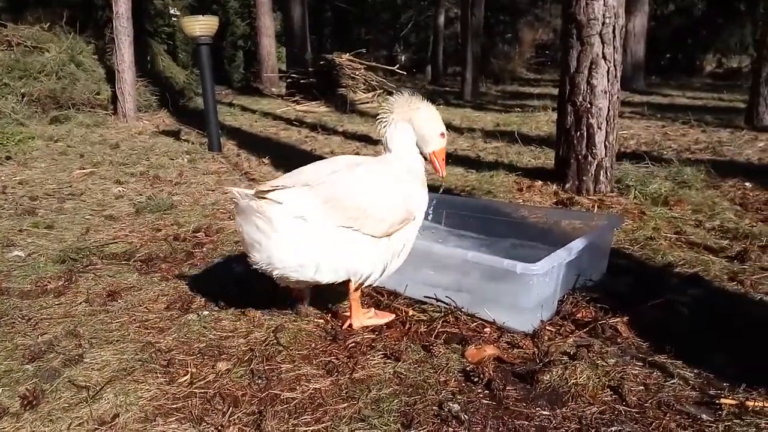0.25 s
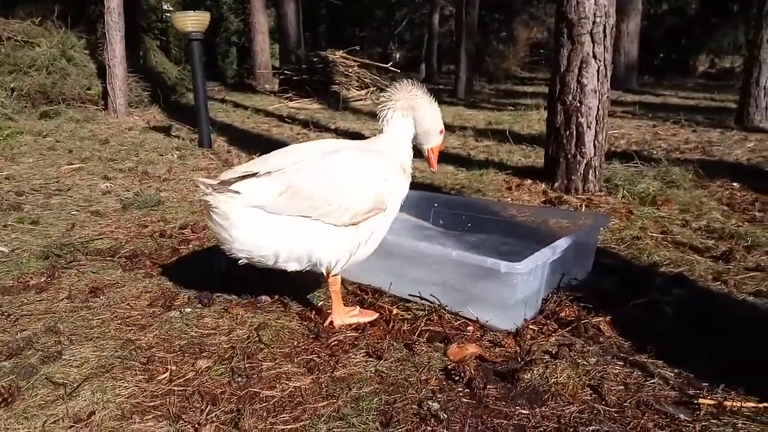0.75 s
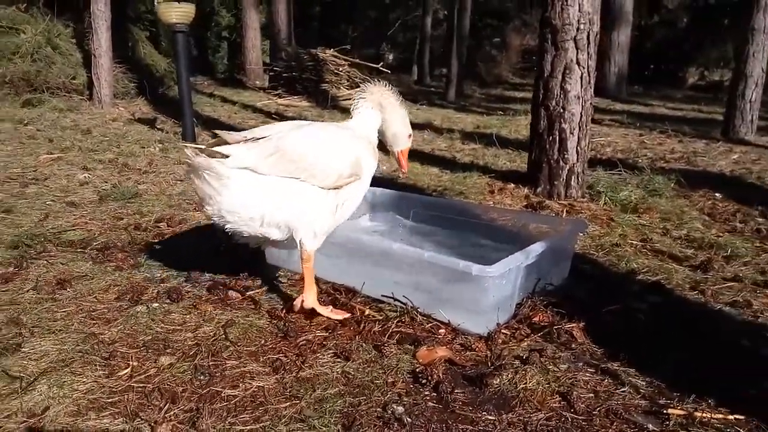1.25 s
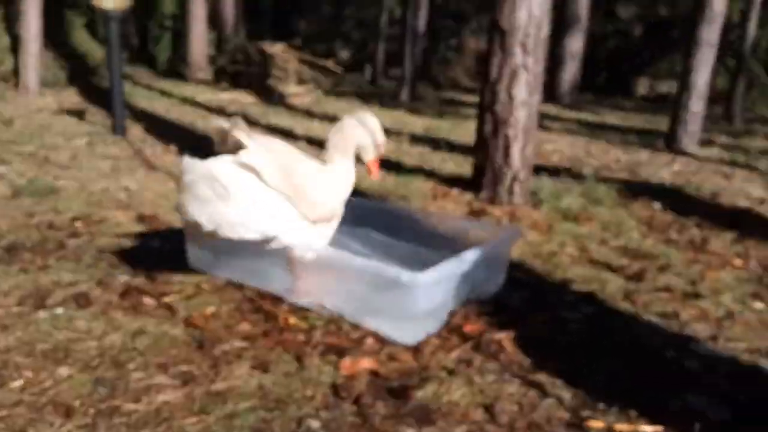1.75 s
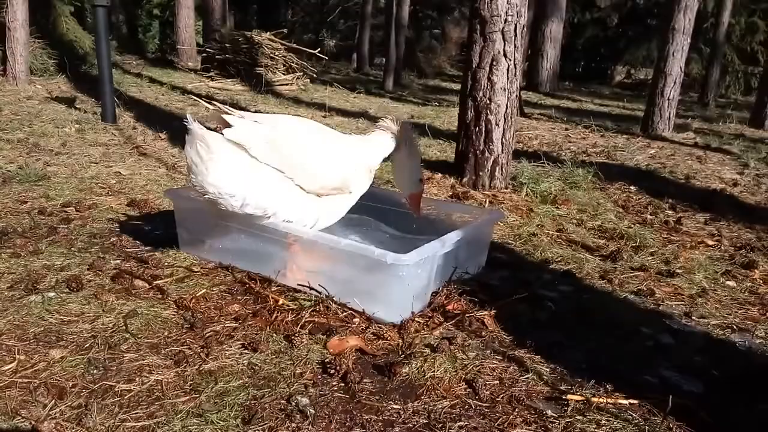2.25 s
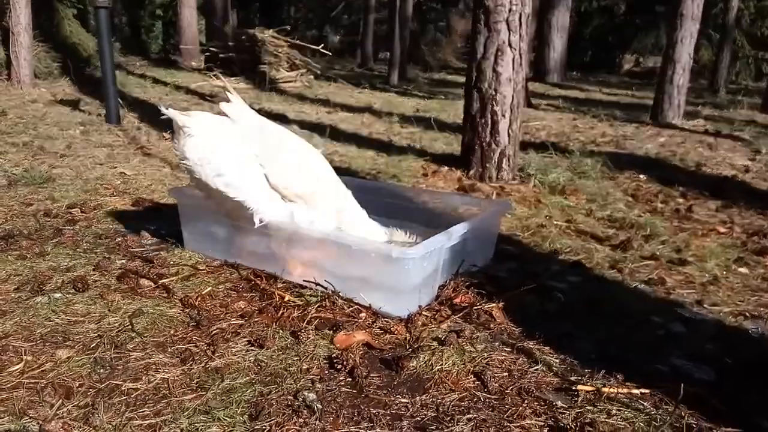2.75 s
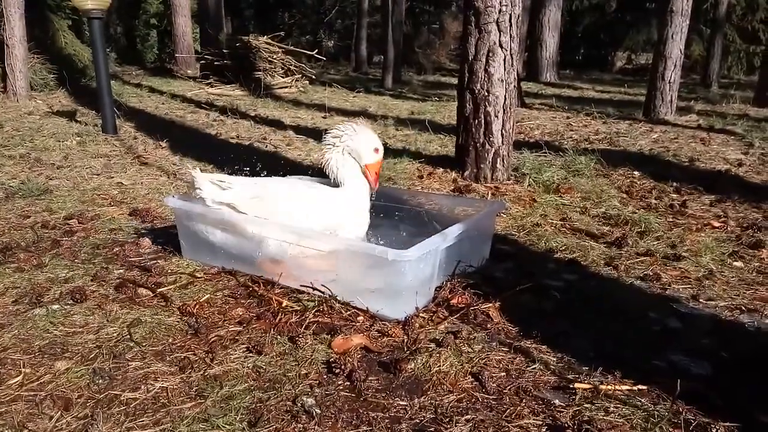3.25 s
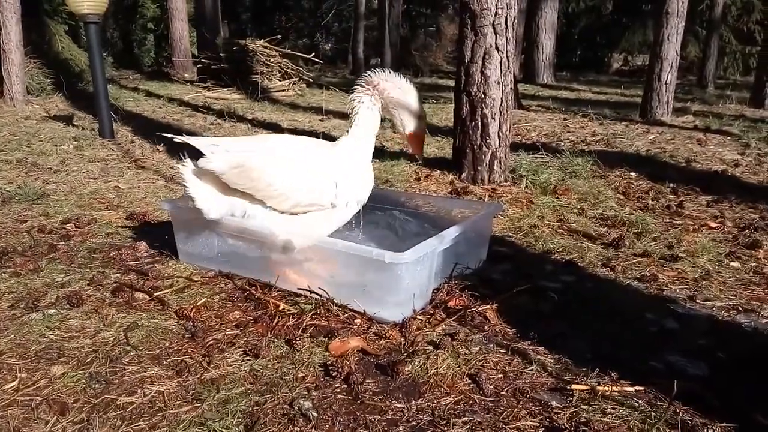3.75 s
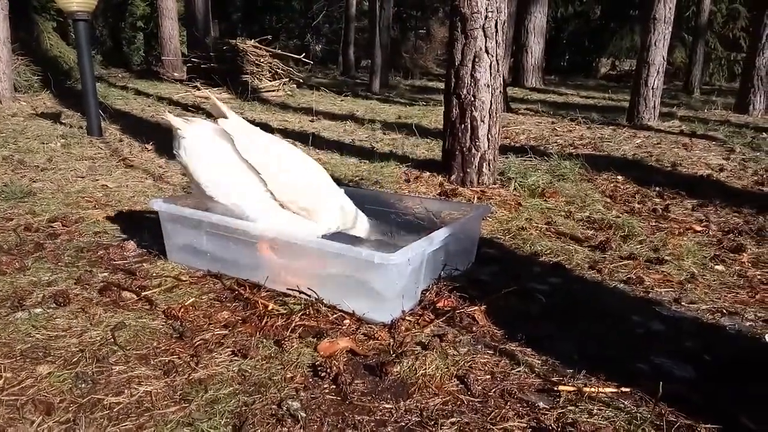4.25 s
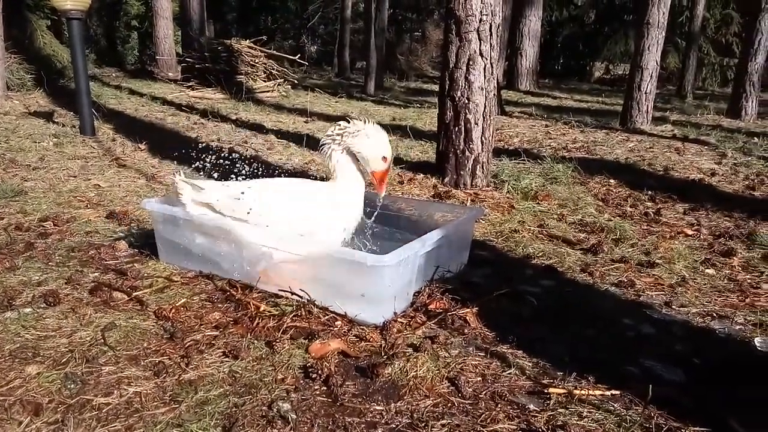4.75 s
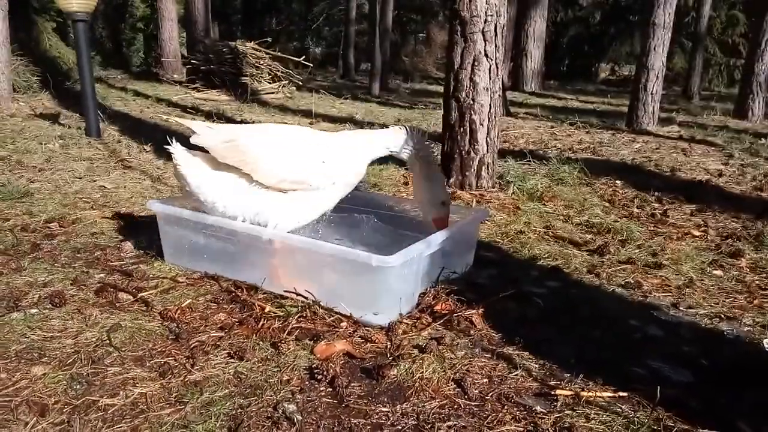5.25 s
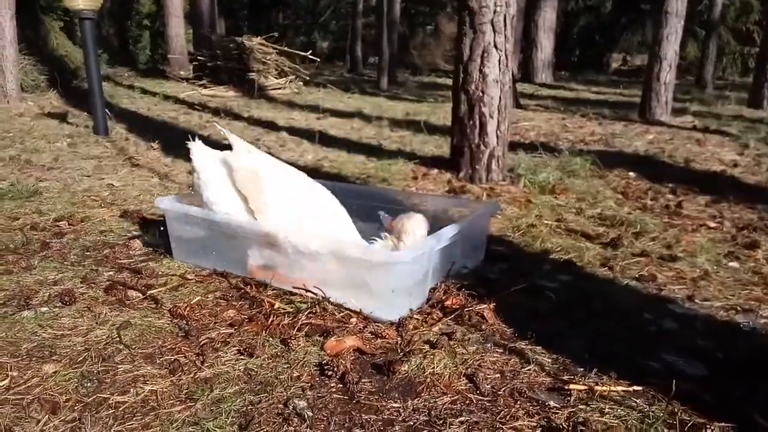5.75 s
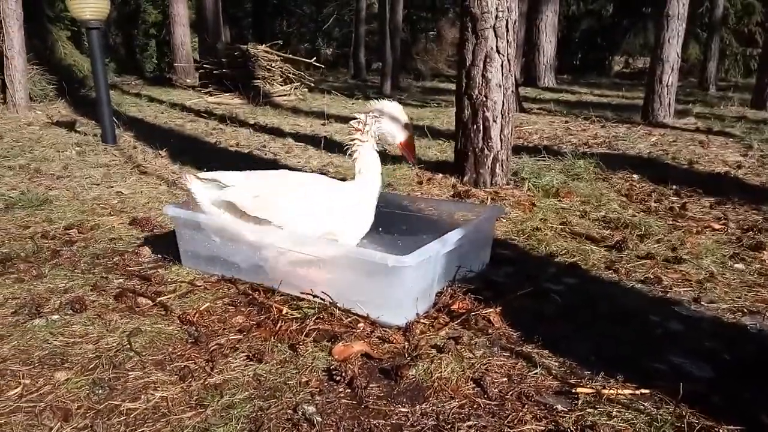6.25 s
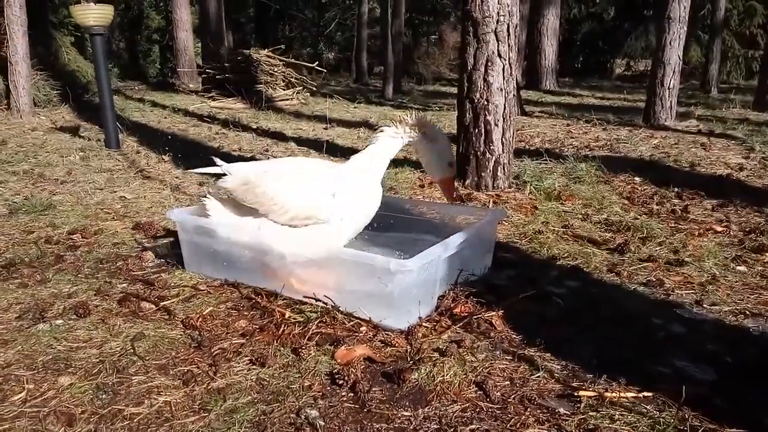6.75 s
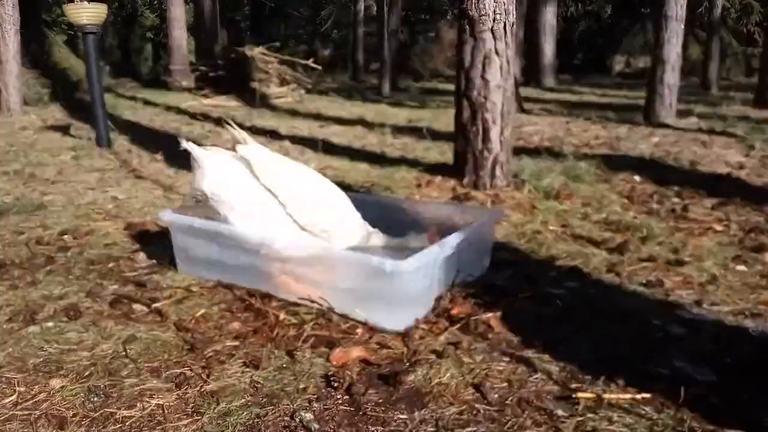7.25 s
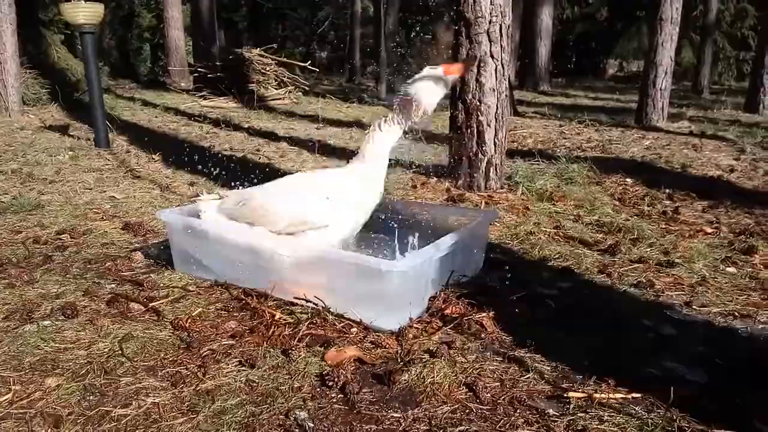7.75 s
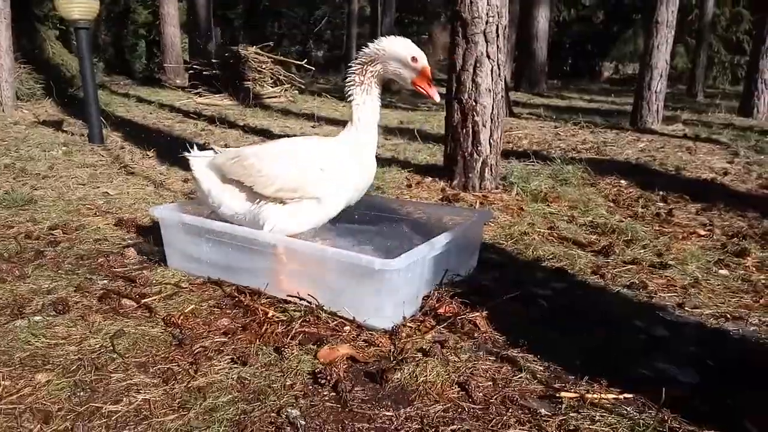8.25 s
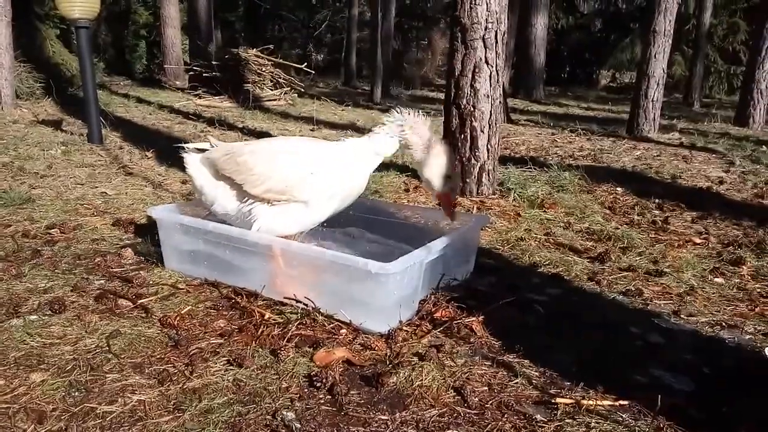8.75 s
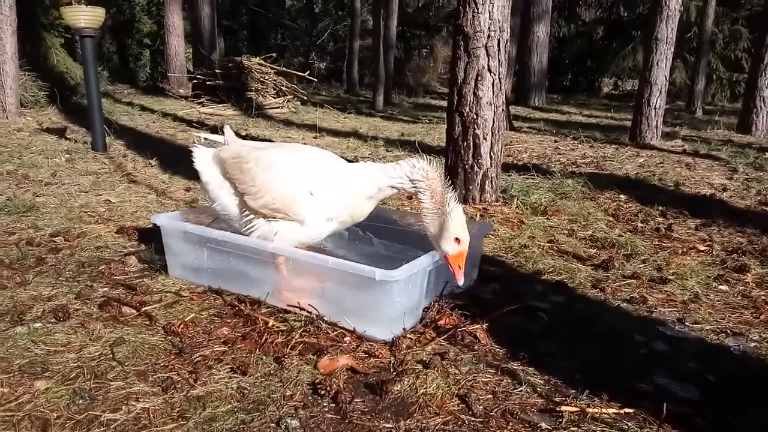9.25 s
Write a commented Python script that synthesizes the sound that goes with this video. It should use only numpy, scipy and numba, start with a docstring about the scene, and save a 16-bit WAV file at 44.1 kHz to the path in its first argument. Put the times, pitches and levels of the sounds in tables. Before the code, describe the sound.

Outdoors near trees, gusts rumble and buffet the microphone, mostly on the right, while a goose treads faintly on dry needles. It climbs into a shallow plastic tub with a sharp crack, hollow knocks and dull thuds, then ducks its head four times; each rise brings a wet slap, spray and trickling run-off with gurgles and plinks. The wind fades, and a last firm knock sounds near the end over quiet air.

```python
"""A goose steps over dry pine needles, each a tiny click, while gusts rumble and buffet two microphone ports.
It climbs into a shallow plastic tub outdoors: feet and body knock damped wall modes and thud the floor.
It bathes, ducking its head again and again: noise bursts slap, the run-off falls as spray and droplet ticks,
and gurgles and bubbles ring as dying sines. The gusts give out early; a steady hush of noise lies under it all."""
import sys
import numpy as np
from scipy import signal
from scipy.fft import rfft, irfft, next_fast_len
from scipy.io import wavfile
from scipy.ndimage import uniform_filter1d
from numba import njit

SR = 44100
rng = np.random.default_rng(int(sys.argv[2]) if len(sys.argv) > 2 else 0)


def wav_out(sig):
    """Save sig, one row per channel (or a flat mono array), as 16-bit PCM at SR to the path in sys.argv[1]."""
    wavfile.write(sys.argv[1], SR, np.round(np.clip(np.atleast_2d(sig).T, -1, 1) * 32767).astype(np.int16))


N = 419391
TIME = np.arange(N) / SR

# loudest splashes and footfalls, those before 1.4 s on the needles: t/s, relative level/dB, t60/s, centre f/Hz
SPLASHES = [(.165, -37.5, 0.032, 7000), (0.387, -39.5, 0.045, 5500), (.606, -57.5, 0.058, 3680),
            (0.78, -52.5, 0.054, 4400), (1.5585, -22, 0.014, 3800), (1.628, -41, .03, 5200),
            (1.648, -27, 0.012, 5000), (1.723, -34, 0.011, 5860), (1.7738, -29, 0.036, 3300),
            (1.835, -40.5, .022, 8030), (1.895, -35, 0.063, 3800), (1.907, -32.5, 0.053, 4700),
            (2.038, -42, 0.02, 5400), (2.122, -44, 0.021, 12000), (2.5, -39, 0.014, 3040),
            (2.6518, -37, .013, 1780), (2.861, -36, 0.038, 4220), (3.146, -39.5, 0.14, 4430),
            (3.2784, -36.5, 0.031, 4600), (3.364, -30.5, 0.019, 5100), (3.4465, -37.5, 0.036, 2980),
            (3.563, -46.5, 0.041, 5670), (3.818, -44.5, 0.024, 5400), (3.9887, -43, 0.043, 3940),
            (4.173, -42, 0.023, 2920), (4.311, -46.5, .025, 3500), (4.448, -25.5, 0.029, 4420),
            (4.4659, -27.5, 0.037, 4360), (4.573, -43, 0.07, 4560), (4.613, -44, 0.032, 5200),
            (4.892, -41.5, 0.031, 2980), (5.101, -41, 0.064, 6100), (5.231, -43, 0.048, 5000),
            (5.4683, -36.5, 0.028, 4270), (5.5734, -34, 0.041, 4160), (5.752, -23.5, 0.029, 4400),
            (5.764, -28.5, .035, 4350), (5.8955, -42, 0.023, 2210), (5.907, -39, 0.031, 3500),
            (6.084, -32, 0.024, 5000), (6.097, -32.5, 0.037, 3540), (6.1589, -37, 0.061, 4300),
            (6.197, -34, 0.031, 9300), (6.203, -40, .03, 3200), (6.712, -42, 0.043, 5840),
            (6.727, -41, .04, 5800), (6.748, -39, 0.041, 4700), (6.815, -47.5, 0.048, 4900),
            (7.065, -47.5, 0.033, 2800), (7.125, -49.5, .025, 3500), (7.361, -31.5, 0.074, 4670),
            (7.37, -28.5, 0.028, 4600), (7.375, -26.5, 0.029, 3130), (7.627, -40.5, 0.054, 3960),
            (7.9742, -41, 0.029, 3730), (8.0846, -38.5, 0.05, 2390), (8.173, -39.5, 0.042, 3000),
            (8.3284, -39.5, 0.056, 3180), (8.45, -37, 0.032, 3600), (8.586, -41.5, 0.026, 5200),
            (8.9331, -32.5, 0.03, 2820), (8.968, -47, .02, 4660), (9.328, -52, 0.03, 5740)]
BUILD_UP_SHARE = 0.25  # a splash's build-up scales with this share of its t60


def from_db(db):
    """Decibels to gain."""
    return 10 ** (np.asarray(db) / 20)


def rms_one(x):
    """Scale to rms 1."""
    return x / np.sqrt(np.mean(x ** 2) + 1e-20)


def band(x, low_hz, high_hz, order=2):
    """Butterworth band-pass."""
    edges_hz = np.clip([low_hz, high_hz], 10, .45 * SR)
    sos = signal.butter(order, edges_hz, "band", fs=SR, output="sos")
    return signal.sosfilt(sos, x + 1e-18)


def coloured(x, spectrum):
    """Filter x by a gain curve of (f/Hz, gain/dB) points, joined along log f."""
    size = next_fast_len(N + 4096)
    hz, db = np.transpose(spectrum)
    bin_hz = np.fft.rfftfreq(size, 1 / SR)
    gain = from_db(np.interp(np.log(bin_hz + 1), np.log(hz), db))
    return irfft(rfft(x, size) * gain, size)[..., :N]


def drift(rate_hz):
    """Random values drawn rate_hz times a second, joined by straight lines; rms 1."""
    points = rng.standard_normal(N // 40)
    return rms_one(np.interp(TIME * rate_hz, np.arange(N // 40), points))


def evened(x, span_s):
    """Hold the rms near 1 over span_s; faster detail stays."""
    power = uniform_filter1d(np.mean(x ** 2, axis=0), max(int(span_s * SR), 1))
    smooth = uniform_filter1d(power, max(int(span_s * SR / 2), 1))
    return x / np.sqrt(smooth + np.mean(power) / 20)


def add(out, s, sound):
    """Mix a sound in at time s."""
    at = int(np.clip(s * SR, 0, N - 1))
    out[..., at:at + sound.shape[-1]] += sound[..., :N - at]


def swell(s, length_s, rise_db_per_s, fall_db_per_s):
    """Attack, hold and release, as a power that holds at 1."""
    rise_db = rise_db_per_s * np.maximum(s - TIME, 0)
    fall_db = fall_db_per_s * np.maximum(TIME - s - length_s, 0)
    return np.exp(-np.log(10) / 10 * np.minimum(rise_db + fall_db, 200))


def nearby_echoes(sound, echo_db=-7.5, latest_s=0.0055, count=4):
    """The nearest surfaces answer within milliseconds, differently for every call and port."""
    out = sound * np.ones((2, 1))
    for port in range(2):
        slots = (np.arange(count) + rng.random(count)) / count
        lags = 1 + (latest_s * SR * slots).astype(int)
        path = np.zeros(lags[-1] + 1)
        path[lags] = from_db(echo_db) * rng.choice([-1, 1], count)
        path[0] = 1
        out[port] = np.convolve(out[port], path)[:out.shape[1]] / np.linalg.norm(path)
    return out


@njit
def bubble_rings(s, hz, gain, t60, rise, phases):
    """Each bubble is a dying sine whose pitch climbs as it nears the surface; gain and phase are per port."""
    out = np.zeros((2, N))
    for k in range(len(s)):
        at = int(s[k] * SR)
        for i in range(max(0, -at), min(int(t60[k] * SR), N - at)):
            t = i / SR
            age = t / t60[k]
            height = np.exp(-6.9 * age) * min(1., t * hz[k] / 2)
            phase = 2 * np.pi * hz[k] * t * (1 + rise[k] * (age - .25) / 2)
            for port in range(2):
                out[port, at + i] += height * gain[port, k] * np.sin(phase + phases[port, k])
    return out


def bubbles(s, hz, db, t60, rise, place, phase_spread=1.0, pan_db=6.0):
    """Tub reflections give each bubble its own level and phase at each port, the more so the higher it rings."""
    full_spread_hz = 3250  # the port difference grows with f/full_spread_hz, up to double
    apart = np.array([[1], [-1]]) * place * np.minimum(hz / full_spread_hz, 2)
    gain = from_db(db + pan_db * apart)
    return bubble_rings(s.copy(), hz.copy(), gain, t60.copy(), rise.copy(), phase_spread * apart)


def air(apart):
    """Steady outdoor hush: noise of a fixed spectrum, partly different at each port."""
    # hush spectrum: f/Hz, relative density/dB
    hush_spectrum = [(20, -12), (80, 11.5), (150, 4.5), (350, -2.5), (750, 1), (1300, -10), (2500, -14),
                     (4000, -17.5), (6500, -11.5), (9000, -10.5), (15000, -24.5)]
    level_db = -67
    mid, side = rms_one(coloured(rng.standard_normal((2, N)), hush_spectrum))
    return from_db(level_db) * (mid + apart * side * [[1], [-1]])


def wind(gain_db, lump_db, eddy_db, eddy_growth):
    """Each port has its own lumpy rumble; strong gusts shed smaller, brighter eddies."""
    # light air between the gusts, until it drops: end t/s, relative left level/dB, right level/dB
    light_air = (4.3, -64.5, -67)
    # gusts at the ports: t/s, length/s, relative left level/dB, right level/dB
    gust_rows = [(0.057, .01, -55, -47.5), (0.174, 0.065, -48, -46.5), (0.237, 0.048, -40.5, -44),
                 (0.32, 0.049, -44, -70), (0.414, .02, -39.5, -51), (0.44, 0.01, -44, -37),
                 (0.489, .05, -34, -26.5), (0.576, 0.034, -51, -27.5), (0.65, 0.015, -62, -33.5),
                 (0.743, 0.042, -41, -25), (0.799, 0.012, -32.5, -32.5), (0.846, 0.061, -41, -31.5),
                 (0.92, .012, -50, -37), (0.969, 0.08, -51, -29), (1.095, 0.0095, -54, -29),
                 (1.12, 0.008, -43.5, -31.5), (2.25, .07, -75, -47), (2.334, 0.019, -72, -39),
                 (2.404, 0.031, -71, -48), (2.498, 0.038, -54, -35), (2.635, 0.096, -59, -35),
                 (3.386, 0.017, -55, -64), (3.492, 0.014, -57.5, -70), (3.553, 0.025, -55.5, -69),
                 (3.7, 0.027, -57, -60)]
    # rumble spectrum: f/Hz, relative density/dB
    rumble_spectrum = [(20, -13), (45, -11), (80, 0.5), (130, 2.5), (210, -4.5), (330, -21), (500, -37),
                       (900, -47), (2000, -87)]
    rise_db_per_s, fall_db_per_s = 376, 288

    end_s, *light_air_db = light_air
    power = np.outer(from_db(light_air_db) ** 2, swell(0, end_s, rise_db_per_s, fall_db_per_s))
    for s, length_s, *db in gust_rows:
        power += np.outer(from_db(db) ** 2, swell(s, length_s, rise_db_per_s, fall_db_per_s))
    port_db = 10 * np.log10(power)
    lumps_db = lump_db * np.array([drift(60), drift(60)])
    rumble = evened(coloured(rng.standard_normal((2, N)), rumble_spectrum), span_s=0.061)
    eddies = rms_one(band(rng.standard_normal((2, N)), 212, 507, order=3))
    # the lumps act twice on the eddies
    eddy_gain = from_db(eddy_db + eddy_growth * (port_db - port_db.max()) + lumps_db)
    return from_db(port_db + gain_db + lumps_db) * (rumble + eddies * eddy_gain)


def bloops(gain_db, fade_db):
    """A large bubble's pitch climbs ever faster as it reaches the surface, where the note breaks off."""
    # t/s, length/s, relative peak/dB, starting f/Hz, final f/Hz
    bloop_rows = [(0.041, 0.019, -55, 1380, 2000), (0.051, 0.02, -55.5, 1980, 2130),
                  (3.094, 0.032, -49, 840, 940), (3.236, 0.037, -39.5, 606, 770),
                  (5.197, 0.026, -56, 860, 1100), (5.424, 0.017, -46, 1344, 1580),
                  (6.938, 0.0446, -44.5, 380, 670), (7.838, 0.031, -37.5, 1160, 1720),
                  (9.423, 0.023, -57, 1610, 2000)]
    out = np.zeros(N)
    for s, length_s, db, start_hz, end_hz in bloop_rows:
        age = np.linspace(0, 1, int(length_s * SR))
        turns = np.cumsum(start_hz + (end_hz - start_hz) * age ** 3) / SR
        edges = np.minimum(turns / 2, 1) * np.minimum(10 * (1 - age), 1)
        add(out, s, from_db(db + gain_db - fade_db * age) * edges * np.sin(2 * np.pi * turns))
    return out


def gurgles(gain_db, per_s, scatter_octaves, cycles, spread_db, rise):
    """An air pocket breaks into a close run of bubbles, scattered about a pitch that slides as it empties."""
    # t/s, length/s, relative level/dB, f/Hz, end f over start f
    gurgle_rows = [(.055, .035, -61.5, 1690, 0.92), (1.698, 0.063, -49.5, 557, 1.7),
                   (1.874, 0.028, -47, 854, 1.46), (1.943, 0.036, -55, 594, 1.4),
                   (2.942, 0.055, -56.5, 1085, 0.81), (3.018, 0.048, -60, 563, 1.16),
                   (3.14, 0.034, -53.5, 1380, 1.24), (3.251, 0.11, -55.5, 1600, 0.81),
                   (3.373, 0.064, -57.5, 1660, 0.97), (3.881, .13, -60, 1500, 1.6),
                   (3.986, 0.036, -58, 420, 1.05), (4.265, 0.041, -57.5, 540, 0.8),
                   (4.582, 0.04, -52.5, 843, 1.6), (4.644, 0.049, -61, 373, 1.13),
                   (4.715, 0.16, -53.5, 1560, 1.28), (4.757, 0.03, -55.5, 527, 1.9),
                   (5.748, 0.022, -51, 1800, 1.34), (5.869, 0.027, -53.5, 697, 1.6),
                   (6.046, 0.1, -54.5, 1730, 0.93), (6.063, 0.074, -57, 1010, 1.1),
                   (6.157, .02, -54, 550, 1.2), (6.979, .08, -59.5, 3900, 0.93),
                   (7.366, 0.016, -51, 1750, 1), (7.384, .025, -53, 403, 1.2),
                   (7.549, 0.19, -58.5, 1660, 1), (7.696, 0.031, -56.5, 590, 1.33),
                   (7.838, 0.028, -56, 780, 0.92), (8.044, 0.033, -62, 1500, 1.3),
                   (8.179, 0.028, -58.5, 760, 1.1), (8.405, 0.028, -47.5, 1746, 0.79),
                   (8.452, .06, -63, 726, 1.55)]
    out = np.zeros((2, N))
    for s, length_s, db, start_hz, glide in gurgle_rows:
        count = max(round(per_s * length_s), 1)
        jitter, pitch, size, climb, place = rng.random((count, 5)).T
        along = (np.arange(count) + jitter) / count
        hz = start_hz * glide ** along * 2 ** (scatter_octaves * (2 * pitch - 1))
        run = bubbles(along * length_s, hz, spread_db * size, cycles / hz, rise * climb, 2 * place - 1)
        run = run[:, :SR // 2]
        run_rms = np.sqrt(np.sum(run ** 2) / (2 * length_s * SR))
        add(out, s, from_db(db + gain_db) * run / run_rms)
    return out


def needles(per_s, low_hz, high_hz, spread_db, fade_db_per_s):
    """Each tread breaks a cluster of dry needles, one tiny click apiece."""
    # treads: t/s, length/s, level/dB
    tread_rows = [(0.062, 0.058, -63.5), (0.268, 0.034, -64.5), (0.355, .065, -60.5), (.65, 0.049, -70)]
    power = np.zeros(N)
    for s, length_s, db in tread_rows:
        power += from_db(db) ** 2 * swell(s, length_s, fade_db_per_s, fade_db_per_s)
    breaks = rng.random(N) < per_s / SR
    clicks = breaks * from_db(spread_db * rng.random(N)) * rng.choice([-1, 1], N)
    clicks = nearby_echoes(band(clicks, low_hz, high_hz, order=1))
    return np.sqrt(power) * evened(clicks, span_s=0.03)


def plinks(gain_db, ring_scale, apart):
    """The clearest bubbles and drips ring out of the wash as dying sines."""
    # t/s, f/Hz, relative peak/dB, t60/s before ring_scale, pitch rise as a share
    plink_rows = [(.083, 1500, -56, 0.059, .02), (1.886, 1040, -31, 0.015, .02),
                  (1.951, 1455, -46.5, 0.025, .02), (1.9854, 2170, -45, .016, .02),
                  (2.1085, 1680, -47.5, 0.033, 0.61), (2.5696, 5570, -38, 0.012, .05),
                  (2.762, 953, -41.5, 0.033, .02), (2.973, 1080, -47, 0.018, .02),
                  (3.001, 6150, -38.5, 0.0094, .05), (3.088, 2830, -43, .02, .1),
                  (3.1796, 5940, -23, 0.0056, .05), (3.2348, 1480, -38.5, 0.041, 0.63),
                  (3.278, 4170, -37.5, 0.011, .1), (3.287, 1226, -42.5, 0.035, 0.24),
                  (3.324, 3900, -41.5, .023, .02), (3.3627, 4330, -32, 0.011, 0.2),
                  (3.4464, 2000, -45, 0.02, .02), (3.5025, 5300, -34, 0.01, 0.056),
                  (3.968, 2850, -40, .023, 0.083), (4.017, 3420, -29.5, 0.008, .05),
                  (4.0943, 995, -48, .027, .02), (4.1255, 600, -48, 0.051, .02),
                  (4.3066, 6760, -43, 0.011, .02), (4.3817, 900, -53.5, 0.09, .02),
                  (4.509, 4091, -35.5, .015, .02), (4.5831, 3600, -35.5, 0.01, .6),
                  (4.607, 1260, -41, 0.021, .02), (4.712, 4040, -42, .009, .05),
                  (4.813, 4550, -40, .014, .02), (4.833, 1540, -46, 0.022, .05),
                  (4.862, 3560, -45, 0.034, .02), (4.896, 1560, -47.5, 0.027, .02),
                  (4.953, 1640, -52.5, .04, .1), (5.135, 6470, -43.5, 0.009, 0.09),
                  (5.154, 3240, -46, .014, .05), (5.186, 4700, -46, 0.011, .05),
                  (5.068, 4050, -32.5, 0.013, .28), (5.0695, 1610, -44.5, 0.054, .02),
                  (5.41, 4930, -34.5, 0.016, .05), (5.4315, 6800, -32, 0.0068, .05),
                  (5.5693, 1458, -52, 0.094, .02), (5.5802, 3900, -39, 0.015, .07),
                  (5.82, 1060, -50, 0.069, .02), (5.8464, 4840, -38, 0.015, .02),
                  (5.894, 1545, -42, 0.021, 0.024), (5.91, 6470, -36, 0.014, .06),
                  (5.978, 5260, -29.5, 0.0062, .05), (6.095, 1650, -42.5, 0.054, .12),
                  (6.118, 1460, -43, 0.033, .05), (6.137, 1196, -46, .035, .02),
                  (6.159, 4290, -41, 0.017, .05), (6.182, 3850, -35.5, 0.018, .02),
                  (6.1992, 2240, -45.5, 0.02, .02), (6.2961, 4600, -34.5, 0.011, .02),
                  (6.313, 3460, -38, .014, .2), (6.647, 1415, -47, .034, .02),
                  (6.6535, 2140, -49, 0.052, .02), (6.746, 3200, -44, 0.026, 0.26),
                  (7.0566, 2690, -47.5, 0.032, .02), (7.4987, 5400, -35, 0.0093, .05),
                  (7.531, 1860, -41, 0.012, .02), (7.609, 1490, -49, 0.063, .12),
                  (7.6257, 4370, -43, 0.034, .05), (7.672, 1610, -56, 0.084, 0.098),
                  (7.713, 1840, -46, 0.023, .02), (7.9753, 2830, -33.5, 0.0081, .1),
                  (8.084, 1910, -42, 0.026, .02), (8.1726, 830, -33.5, 0.017, 0.018),
                  (8.371, 754, -44.5, 0.024, .14), (8.4228, 1440, -42, 0.028, .02),
                  (8.658, 2310, -51, 0.036, 1), (8.9655, 4600, -36.5, 0.021, .05),
                  (8.989, 5446, -39, 0.0068, .05), (9.188, 1117, -58, 0.06, .02),
                  (9.205, 960, -63, 0.075, .02), (9.299, 2250, -55, .025, .02),
                  (9.457, 2100, -57, 0.032, .1)]
    s, hz, db, t60, rise = np.transpose(plink_rows)
    place = apart * rng.uniform(-1.2, 1, len(s))
    return bubbles(s, hz, db + gain_db, ring_scale * t60, rise, place)


def slaps(gain_db, width, apart, lead_db, tail_db, tail_s, grain_db):
    """A splash or footfall: grainy noise builds up, closes with a sharp burst, and a short scatter follows."""
    out = np.zeros((2, N))
    t = TIME[:SR // 6] - 1 / 25  # 0 at the burst
    for s, db, t60, hz in SPLASHES:
        mid, side, grain = rng.standard_normal((3, len(t)))
        side = band(side, 2300, 15000)
        noise = mid + apart * side * [[1], [-1]]
        burst = rms_one(band(noise, hz / (1 + width), hz * (1 + width), order=1))
        grain = from_db(grain_db * rms_one(uniform_filter1d(grain, size=90)))
        before = from_db(lead_db - 20 * abs(t) / (BUILD_UP_SHARE * t60)) * grain
        after = from_db(-60 * abs(t) / t60) + from_db(tail_db - 60 * abs(t) / tail_s) * grain
        add(out, s + t[0], from_db(db + gain_db) * burst * np.where(t < 0, before, after))
    return out


def trapped_air(gain_db, cycles, rise, octaves, count):
    """A few small ringing bubbles about every slap give it an uneven liquid colour, as air trapped by a splash."""
    s, db, t60, hz = np.repeat(np.array(SPLASHES), count, axis=0).T
    when, pitch, size, place = rng.uniform(-1, 1, (len(s), 4)).T
    hz = np.minimum(hz * 2 ** (octaves * (pitch - .3)), 8000)
    s = s + np.where(when < 0, BUILD_UP_SHARE, 1) * t60 / 2 * when
    return bubbles(s, hz, db + gain_db + 5 * size, cycles / hz, rise * (1 + size), place)


def water_levels():
    """Lapping, ducks and waves add in power to the levels in dB of slosh, bubbling and spray."""
    # waves raised by feet, beak and body; the first row is a soft rustle of feet on the needles:
    # t/s, length/s, level/dB, spray over slosh/dB
    wave_rows = [(0.285, 0.042, -64.5, 4), (1.626, 0.022, -52.5, -10), (1.75, 0.048, -47, 4),
                 (1.853, 0.12, -52.5, -10), (2.011, .11, -59, 6.5), (2.208, 0.038, -79.5, 27),
                 (2.54, 0.061, -68, 9), (2.854, 0.03, -53.5, -6), (2.932, 0.18, -59, 6.5),
                 (3.194, 0.04, -58.5, 12), (3.275, 0.023, -56, 8), (3.558, 0.032, -70.5, 31),
                 (3.652, 0.18, -74.5, 20.5), (4.122, 0.05, -58.5, 9.5), (4.29, 0.11, -68, 1),
                 (4.4, 0.064, -69, 8), (4.576, 0.033, -52.5, 9.5), (4.739, 0.086, -55.5, 0),
                 (5.23, 0.011, -68, -18), (5.459, 0.14, -54.5, 1), (5.682, 0.084, -74, 33),
                 (5.731, 0.089, -56, -3.5), (5.873, 0.012, -51.5, 3), (6.122, 0.062, -60, 11),
                 (6.347, 0.13, -68, 18), (6.64, 0.023, -58.5, 5), (6.817, 0.049, -55.5, -7),
                 (6.961, 0.15, -65, -4), (7.37, 0.036, -52.5, -5), (7.437, 0.15, -59.5, 12.5),
                 (7.699, 0.01, -61, -8), (7.84, 0.031, -56, 6), (7.895, 0.11, -66, 21),
                 (8.164, 0.06, -56.5, 1.5), (8.261, 0.093, -59.5, 0.5), (8.358, 0.094, -55.5, 5.5),
                 (8.598, 0.017, -70, 12)]
    # the water never quite rests once the goose is in: slosh/dB, bubbling/dB, spray/dB
    lapping_db = (-75.5, -90, -74)
    # neck pushes in, head comes up, water runs off the back:
    # dip t/s, dip length/s, dip level/dB, head-up t/s, run-off length/s, run-off level/dB
    duck_rows = [(2.662, 0.15, -60.5, 3.32, 0.21, -58.5), (3.867, 0.22, -56, 4.4, 0.752, -56.5),
                 (5.198, 0.33, -55.5, 5.76, 0.505, -54), (6.704, 0.12, -51, 7.4, 0.75, -61.5)]
    # layer shares in a dip: slosh/dB, bubbling/dB, spray/dB
    dip_mix_db = (-13, -5.5, 0)
    # layer shares in the run-off: slosh/dB, bubbling/dB, spray/dB
    runoff_mix_db = (-9.5, -6.5, 0.56)
    # sag as the feathers drain: slosh/(dB/s), bubbling/(dB/s), spray/(dB/s); negative grows
    sag_db_per_s = (15, 0, -1)
    step_in_s = 1.4  # first foot lands in the tub
    water_rise_db_per_s, water_fall_db_per_s, runoff_rise_db_per_s = 794, 311, 1200

    def stir(s, length_s, db, rise_db_per_s=water_rise_db_per_s):
        """Power of the three layers through one swell."""
        return np.outer(from_db(db) ** 2, swell(s, length_s, rise_db_per_s, water_fall_db_per_s))

    power = stir(step_in_s, N / SR, lapping_db)
    for dip_s, dip_length_s, dip_db, up_s, runoff_s, runoff_db in duck_rows:
        draining = from_db(-np.outer(sag_db_per_s, np.maximum(TIME - up_s, 0))) ** 2
        power += stir(dip_s, dip_length_s, dip_db + np.array(dip_mix_db))
        power += draining * stir(up_s, runoff_s, runoff_db + np.array(runoff_mix_db), runoff_rise_db_per_s)
    for s, length_s, db, bright_db in wave_rows:
        power += stir(s, length_s, db + bright_db / 2 * np.array([-1, 0, 1]))
    return 10 * np.log10(power)


def bubble_cloud(per_s, low_hz, high_hz, cycles, spread_db, rise, even_s):
    """Bubbles of random size, pitch and place, born at random; rms about 1."""
    when, pitch, size, life, climb, place = rng.random((int(per_s * N / SR), 6)).T
    hz = low_hz * (high_hz / low_hz) ** pitch
    db = spread_db * np.minimum(-np.log(1 - size), 4)
    t60 = cycles * (.5 + life) / hz
    cloud = bubbles(when * N / SR, hz, db, t60, 2 * rise * climb, 2 * place - 1)
    return evened(cloud, even_s)


def spray(per_s, spread_db, apart, scatter_t60):
    """Tiny droplets tick on the water, each smeared by the tub walls; rms about 1."""
    # spray spectrum: f/Hz, relative density/dB
    spray_spectrum = [(1500, -6.5), (2600, 1), (3800, -0.5), (5200, 3.5), (6500, -1.5), (9000, -6.5),
                      (15000, -15)]
    sizes = from_db(spread_db * np.minimum(rng.exponential(1, (2, N)), 4))
    ticks = sizes ** 2 * (rng.random((2, N)) < per_s / SR)
    decay = from_db(-120 / (scatter_t60 * SR))  # of power, per sample
    power = signal.lfilter([1], [1, -decay], ticks + 1e-9)
    mid, side = np.sqrt(power) * rng.standard_normal((2, N))
    return evened(coloured(mid + apart * side * [[1], [-1]], spray_spectrum), span_s=0.02)


def stirred_water(slosh_db, bubbling_db, spray_db):
    """Big slow bubbles in the slosh, smaller ones under the run-off, fizz and spray on top."""
    slosh = bubble_cloud(per_s=420, low_hz=222, high_hz=1004, cycles=20, spread_db=4.0, rise=0.24, even_s=0.057)
    slosh = band(slosh, 450, 1800, order=1)  # the deepest bubbles radiate least
    bubbling = bubble_cloud(per_s=760, low_hz=1050, high_hz=2404, cycles=40,
                            spread_db=6.0, rise=0.084, even_s=0.062)
    fizz = bubble_cloud(per_s=1200, low_hz=2678, high_hz=7266, cycles=63, spread_db=5.0, rise=0.22, even_s=0.026)
    churn = rms_one(band(rng.standard_normal(N), 740, 2800)) * from_db(1.8 * drift(140))
    droplets = spray(per_s=380, spread_db=2.5, apart=0.83, scatter_t60=0.024)
    low = from_db(slosh_db) * slosh
    low = low + from_db(bubbling_db - 7.5) * bubbling + from_db(bubbling_db - 12) * churn
    spurts_db = spray_db + 2.56 * drift(90)  # water leaves the feathers in uneven spurts
    return low + from_db(spurts_db) * fizz + from_db(spurts_db - 2.3) * droplets


def stray_drips(water_db, per_s, low_hz, high_hz, base_db, follows, spread_db, cycles, rise):
    """Drops trickle at random and ring over the wash, louder the more water is moving."""
    when, pitch, size, life, climb, place = rng.random((int(per_s * N / SR), 6)).T
    hz = low_hz * (high_hz / low_hz) ** pitch
    db = base_db + follows * water_db[(when * N).astype(int)] + spread_db * (size - .5)
    t60 = cycles * (.5 + life) / hz
    return bubbles(when * N / SR, hz, db, t60, rise * climb ** 2, place - .5)


def buffets(gain_db):
    """An eddy crossing a port makes one swing of pressure."""
    # hardest buffets: t/s, relative left peak/dB, right peak/dB, f/Hz
    buffet_rows = [(.451, -40, -17, 186), (0.4934, -11.5, -41, 442), (.503, -9, -19, 173),
                   (0.585, -50, -16.5, 330), (0.591, -41, -13.5, 390), (.683, -55, -27.5, 268),
                   (.743, -44, -7.5, 217), (0.806, -28, -15, 190), (0.879, -50, -18, 390),
                   (0.908, -37, -13.5, 153), (.968, -48, -16.5, 197), (.992, -44, -13.5, 193),
                   (1.023, -42, -14, 225), (1.064, -55, -25.5, 380), (1.096, -50, -13, 212),
                   (2.352, -62, -24.5, 210), (2.475, -55, -19.5, 180), (2.522, -49, -16, 254),
                   (2.534, -50, -19.5, 271), (2.633, -46, -17.5, 247), (2.663, -50, -14.5, 182),
                   (2.703, -52, -26, 289), (2.727, -58, -24.5, 239)]
    out = np.zeros((2, N))
    t = TIME[:SR // 20] - 1 / 40  # 0 at the peak
    for s, left_db, right_db, hz in buffet_rows:
        u = (np.pi * hz * t) ** 2
        add(out, s + t[0], np.outer(from_db([left_db, right_db]), (1 - 2 * u) * np.exp(-u)))
    return from_db(gain_db) * band(out, 75, 3000, order=1)


def snaps(gain_db, t60):
    """A hard hit, a twig or a drop on plastic cracks: a dying sine a few cycles long, and its echoes."""
    # t/s, relative peak/dB, f/Hz
    snap_rows = [(.676, -45, 4300), (0.779, -45, 4740), (1.493, -41.5, 6200), (1.503, -37, 6200),
                 (1.507, -37, 5900), (1.518, -40, 6160), (1.519, -38, 3900), (1.5596, -15, 5300),
                 (1.648, -32, 5950), (2.863, -20.5, 5920), (4.4484, -27, 3900), (4.548, -31, 4430),
                 (5.123, -41, 4600), (5.375, -39, 6400), (5.7545, -26, 4800), (6.426, -36, 7400),
                 (7.3702, -17.5, 5760), (7.73, -37, 6000), (8.5849, -37.5, 4660), (8.586, -35, 7200),
                 (8.599, -45, 6900)]
    out, t = np.zeros((2, N)), TIME[:SR // 50]
    for s, db, hz in snap_rows:
        crack = from_db(db + gain_db - 60 * t / t60) * np.sin(2 * np.pi * hz * t)
        add(out, s, nearby_echoes(crack))
    return out


def tub_knocks(gain_db, vary_db, stretch, stretch_s, swell_cycles):
    """Each blow of foot or body rings the water-damped walls; a soft contact spares the high modes."""
    # blows: t/s, relative peak/dB, contact cut-off f/Hz, wall pitch ratio at that spot
    knock_rows = [(1.5591, -24.5, 1800, 0.98), (1.6256, -19.5, 590, 0.81), (1.648, -26.5, 700, 0.98),
                  (1.732, -25.5, 800, 0.76), (1.745, -25, 600, 0.47), (1.771, -39, 900, 1.6),
                  (2.5, -37.5, 1510, 1.62), (2.652, -30.5, 1500, 1.26), (2.86, -32.5, 890, 1.06),
                  (4.17, -32.5, 900, 1.08), (4.446, -33.5, 1200, 1.1), (5.466, -29, 1700, 1.46),
                  (5.485, -34, 400, 0.51), (7.067, -40, 800, 1.06), (7.125, -46.5, 900, 0.87),
                  (7.368, -26, 800, 0.95), (8.087, -44.5, 700, 1.04), (8.933, -17, 1090, 1)]
    # wall modes: f/Hz before the pitch ratio, relative level/dB, t60/s
    tub_modes = [(85, -38.5, 0.34), (121, -19.5, 0.14), (195.6, -24.5, 0.19), (241, -7.5, 0.086),
                 (263.5, -11, 0.091), (370.4, -7, 0.086), (417, -2, 0.057), (545, -15.5, 0.051),
                 (702, -14, 0.063), (1135, -22, 0.037), (1500, -18, 0.0091)]
    out, t = np.zeros(N), TIME[:SR // 2]
    hz, mode_db, t60 = np.transpose(tub_modes)[:, :, None]
    # the dented wall is stiffer at first, so its pitch sags as it relaxes
    clock = t + stretch * stretch_s * (1 - np.exp(-t / stretch_s))
    # low modes take longer to get going
    shape = from_db(-60 * t / t60) * (1 - np.exp(-hz * t / swell_cycles))
    for s, db, contact_hz, ratio in knock_rows:
        gain = from_db(db + gain_db + mode_db + vary_db * rng.standard_normal(hz.shape))
        gain = gain / np.hypot(1, (ratio * hz / contact_hz) ** 2)
        add(out, s, np.sum(gain * shape * np.sin(2 * np.pi * ratio * hz * clock), axis=0))
    return band(out, 86, 4000, order=1)  # so small a wall radiates little bass


def thuds(low_hz, high_hz, attack_s, t60):
    """The goose's weight bumps the loaded tub floor dully on the ground: a dying burst of low noise."""
    # t/s, level/dB
    thud_rows = [(1.559, -41.5), (1.628, -42), (1.756, -42), (4.171, -49.5), (5.477, -50), (8.935, -45)]
    out, t = np.zeros(N), TIME[:SR // 2]
    for s, db in thud_rows:
        noise = rms_one(band(rng.standard_normal(len(t)), low_hz, high_hz))
        add(out, s, from_db(db - 60 * t / t60) * (1 - np.exp(-t / attack_s)) * noise)
    return out


def clearing(x, trees_db, trees_t60):
    """A faint scatter comes back from the ground and the trees."""
    t = TIME[:SR // 2]
    echo = band(rng.standard_normal((2, len(t))), 480, 11000, order=1)
    echo = echo * from_db(-60 * t / trees_t60) * (t > .004)
    echo = rms_one(echo) / np.sqrt(len(t))
    return x + from_db(trees_db) * signal.fftconvolve(x, echo, axes=1)[:, :N]


def scene():
    """The needles and the bath with their echo, then the wind and the hush."""
    slosh_db, bubbling_db, spray_db = water_levels()
    bath = stirred_water(slosh_db, bubbling_db, spray_db)
    bath = bath + stray_drips(spray_db, per_s=99, low_hz=2310, high_hz=6180, base_db=-16.0,
                              follows=0.66, spread_db=11.5, cycles=46, rise=0.23)
    bath = bath + tub_knocks(gain_db=-2.0, vary_db=1.5, stretch=0.069, stretch_s=0.0095, swell_cycles=0.82)
    bath = bath + snaps(gain_db=3.5, t60=0.0038)
    bath = bath + thuds(low_hz=69.4, high_hz=242, attack_s=0.00075, t60=0.29)
    bath = bath + plinks(gain_db=3.0, ring_scale=1.2, apart=0.68)
    bath = bath + gurgles(gain_db=-2.5, per_s=190, scatter_octaves=0.28, cycles=28.5, spread_db=9.5, rise=0.16)
    bath = bath + bloops(gain_db=-6.5, fade_db=5)
    bath = bath + slaps(gain_db=-1.0, width=0.33, apart=0.73, lead_db=-8.0,
                        tail_db=-29.0, tail_s=0.014, grain_db=3.5)
    bath = bath + trapped_air(gain_db=-9.0, cycles=30.0, rise=0.56, octaves=1.12, count=5)
    bath = bath + needles(per_s=530, low_hz=4000, high_hz=7700, spread_db=17, fade_db_per_s=450)
    bath = clearing(bath, trees_db=-14, trees_t60=0.21)
    gusts = wind(gain_db=1.96, lump_db=3.0, eddy_db=-14.5, eddy_growth=0.71)
    return bath + gusts + buffets(gain_db=-1.1) + air(apart=0.6)


def record(dry):
    """Each port colours the sound in its own way; the top is cut."""
    # port colour: f/Hz, left gain/dB, right gain/dB
    port_colour = [(20, -4, -6), (1985, 2.5, 2), (2480, -1.5, -6.5), (3480, 0, -1.5), (4360, -3, 5.5),
                   (5130, -0.5, -2), (6340, 0, 7), (7560, 0.5, -4), (8670, -8.5, -15.5),
                   (10900, -9.5, -11.5), (12700, -12, -20), (15500, -13, -15.5)]
    cutoff_hz = 15600
    curves = np.array(port_colour)
    heard = np.array([coloured(dry[k], curves[:, [0, k + 1]]) for k in range(2)])
    return signal.sosfilt(signal.ellip(10, .1, 80, cutoff_hz, fs=SR, output="sos"), heard)


dry = scene()
out = record(dry)
wav_out(out)
```